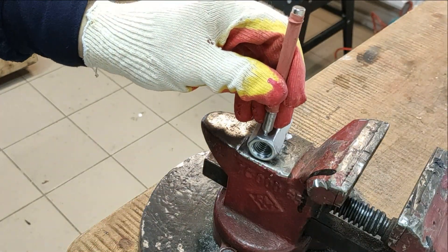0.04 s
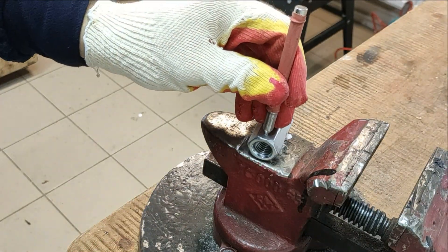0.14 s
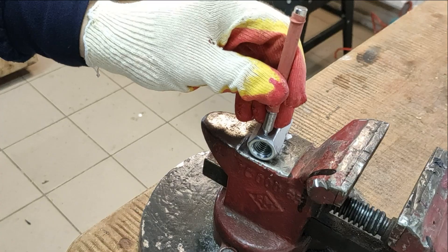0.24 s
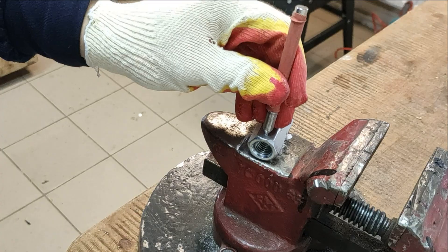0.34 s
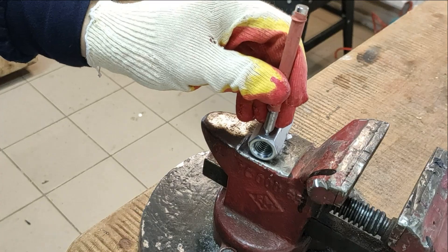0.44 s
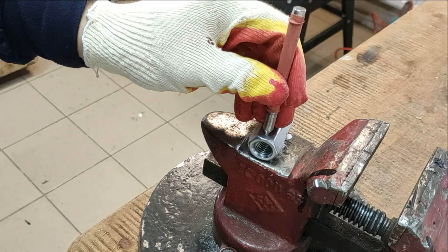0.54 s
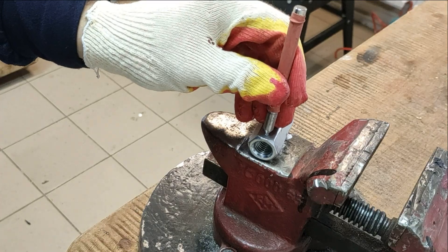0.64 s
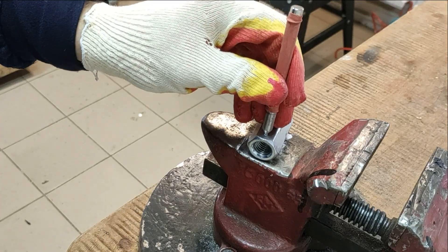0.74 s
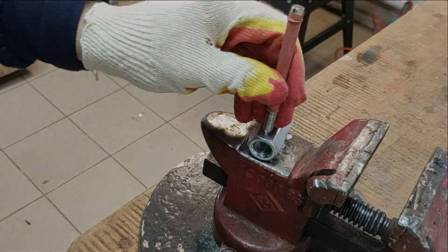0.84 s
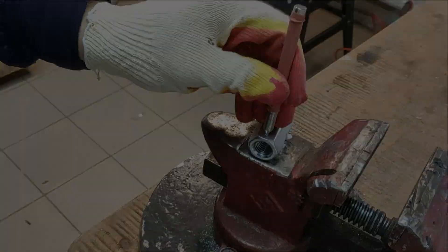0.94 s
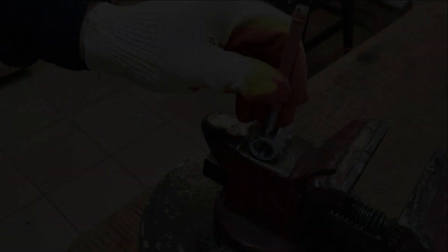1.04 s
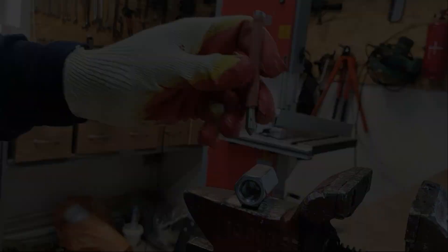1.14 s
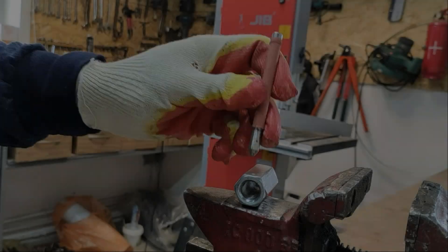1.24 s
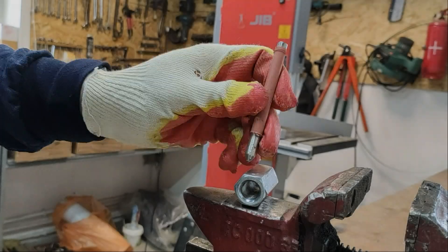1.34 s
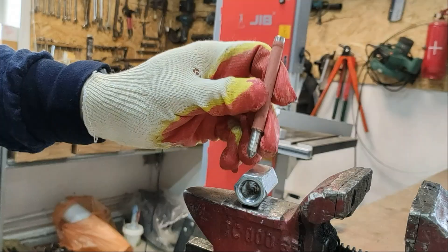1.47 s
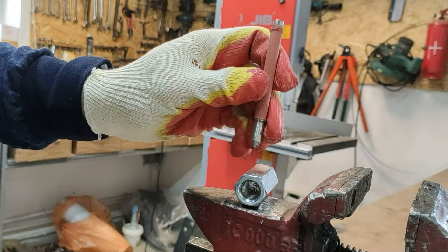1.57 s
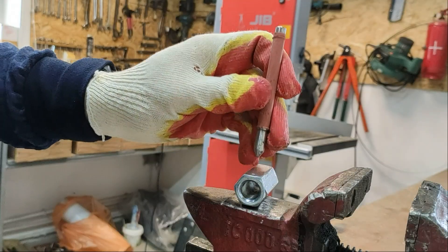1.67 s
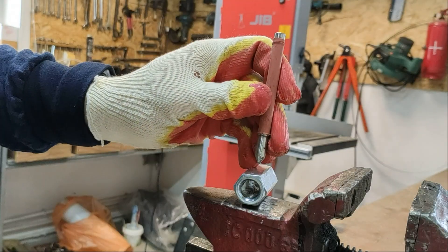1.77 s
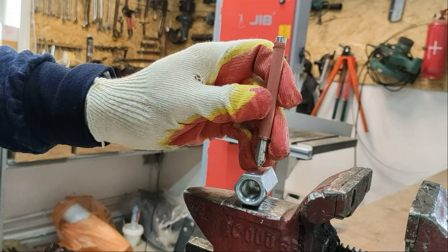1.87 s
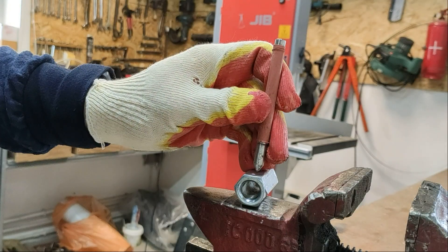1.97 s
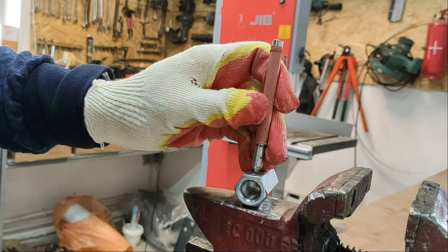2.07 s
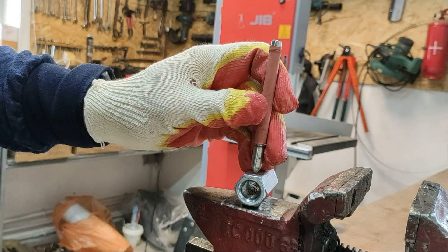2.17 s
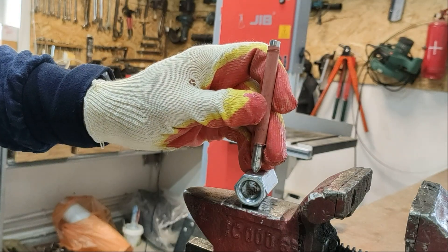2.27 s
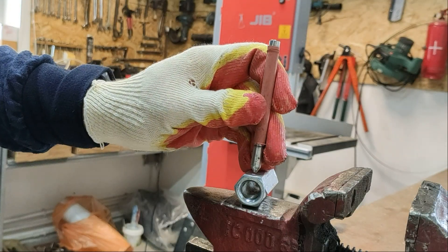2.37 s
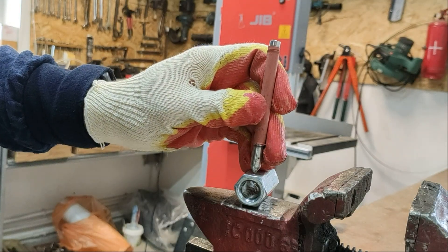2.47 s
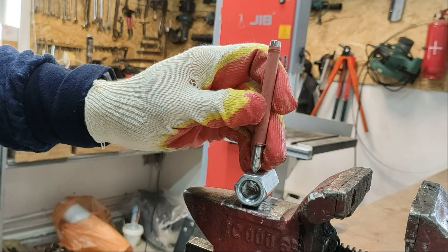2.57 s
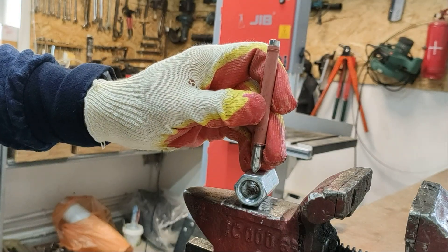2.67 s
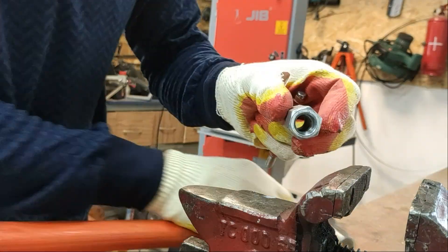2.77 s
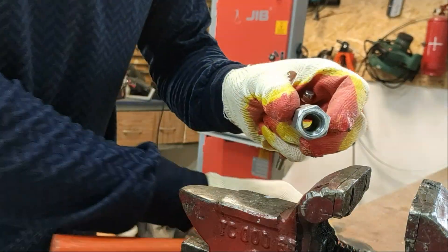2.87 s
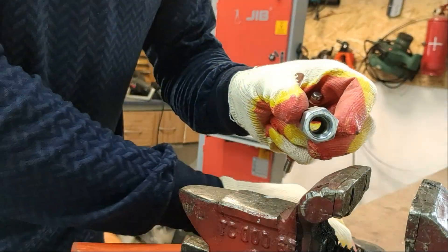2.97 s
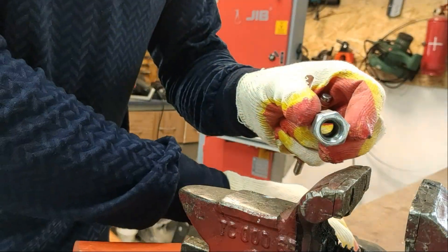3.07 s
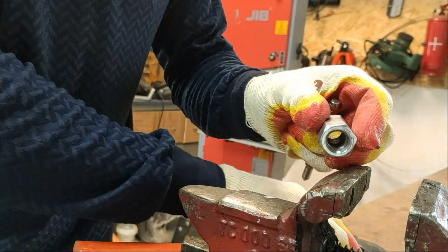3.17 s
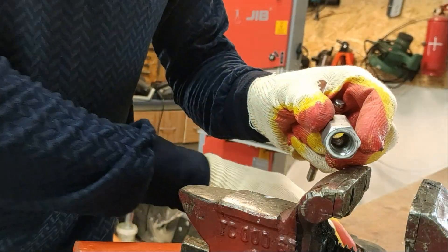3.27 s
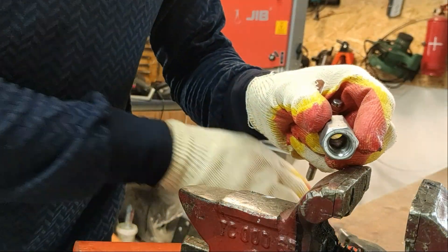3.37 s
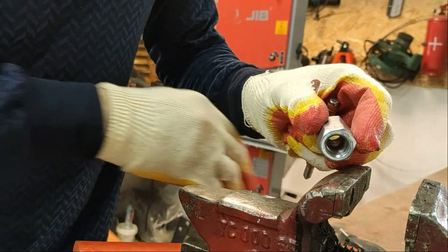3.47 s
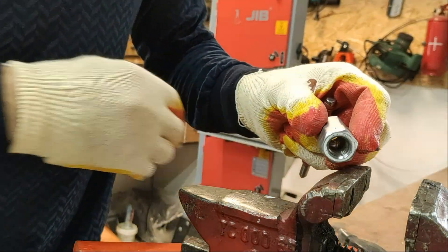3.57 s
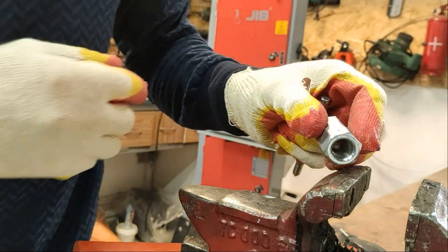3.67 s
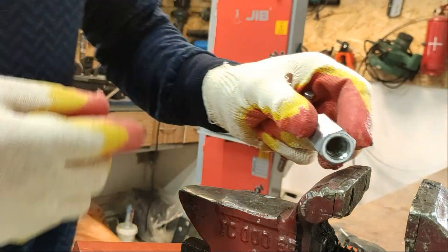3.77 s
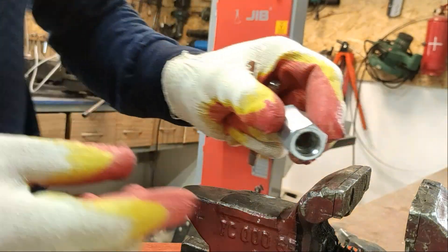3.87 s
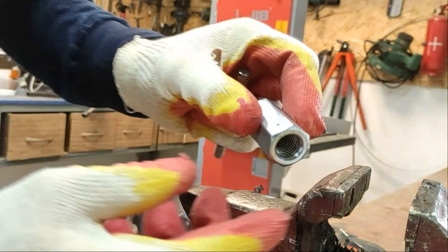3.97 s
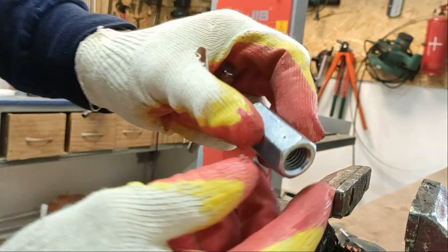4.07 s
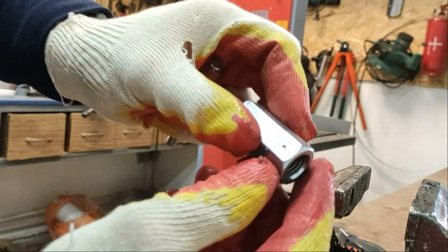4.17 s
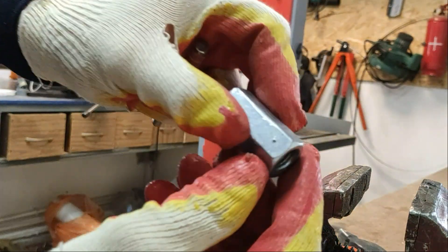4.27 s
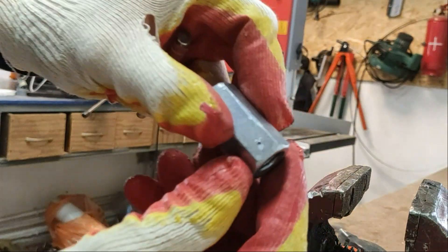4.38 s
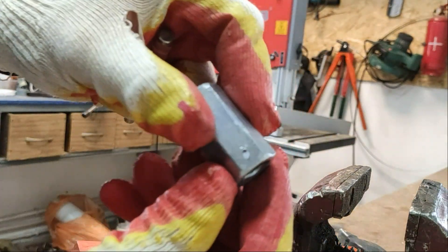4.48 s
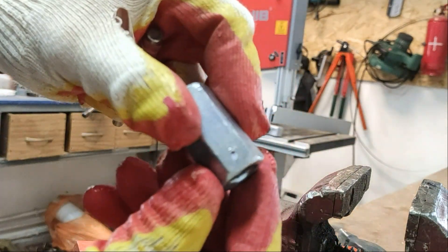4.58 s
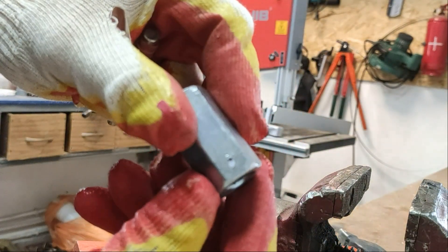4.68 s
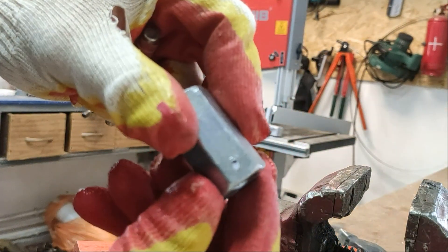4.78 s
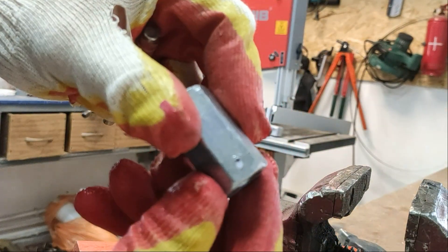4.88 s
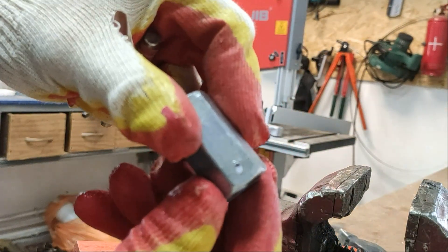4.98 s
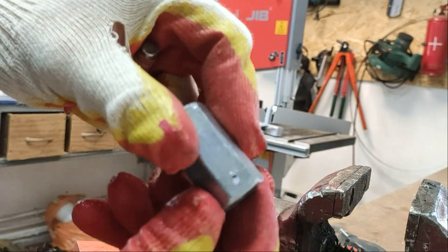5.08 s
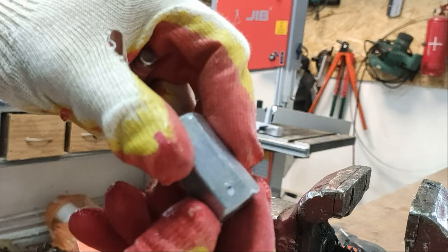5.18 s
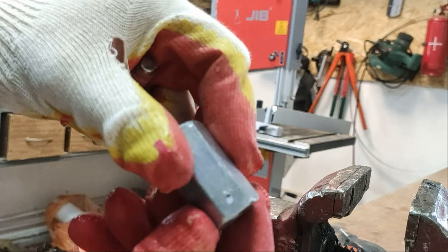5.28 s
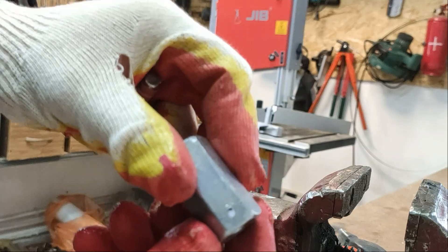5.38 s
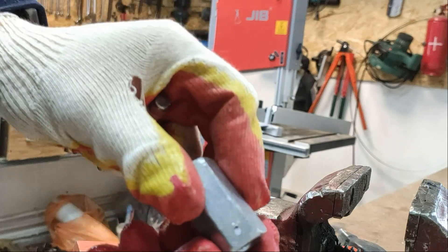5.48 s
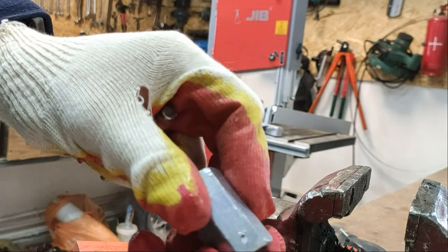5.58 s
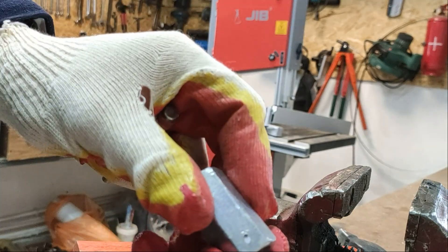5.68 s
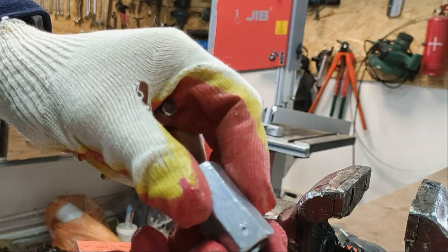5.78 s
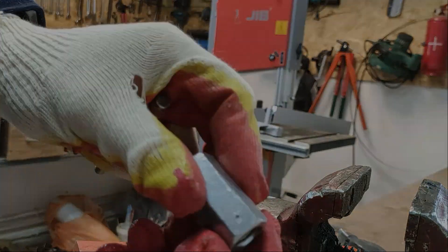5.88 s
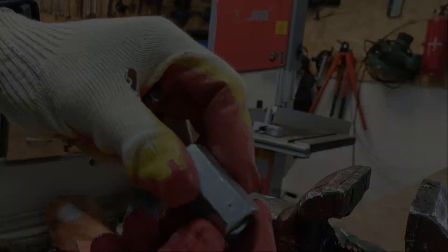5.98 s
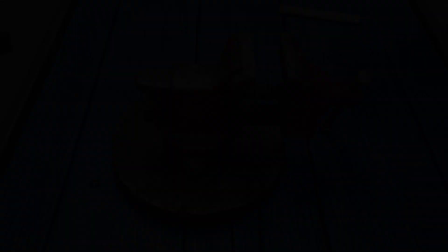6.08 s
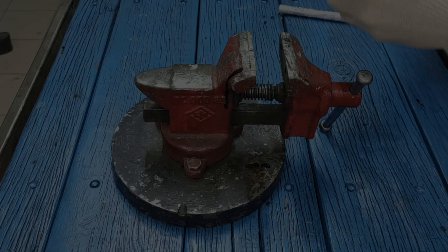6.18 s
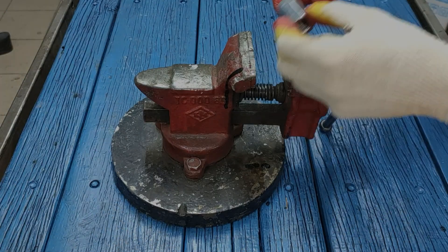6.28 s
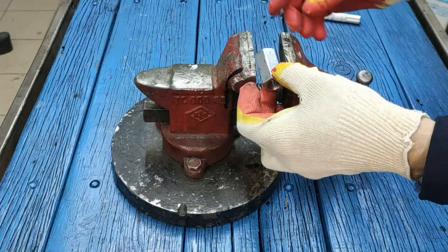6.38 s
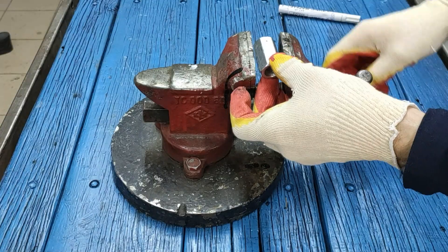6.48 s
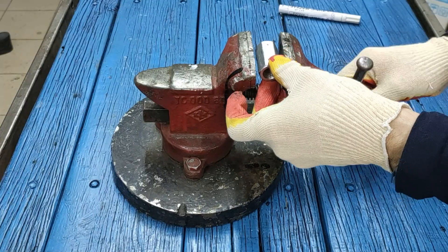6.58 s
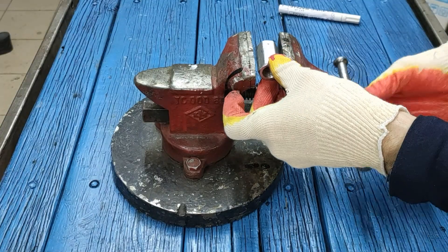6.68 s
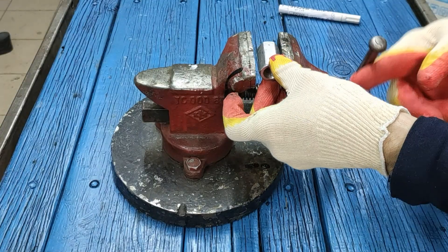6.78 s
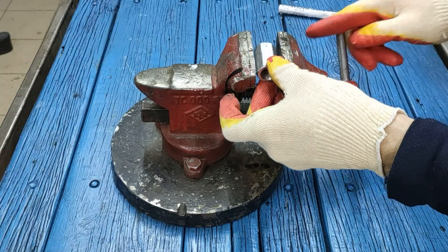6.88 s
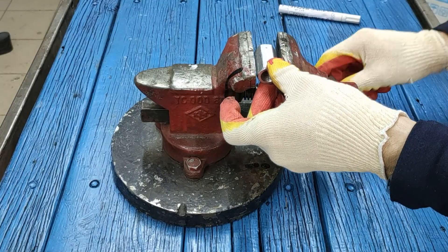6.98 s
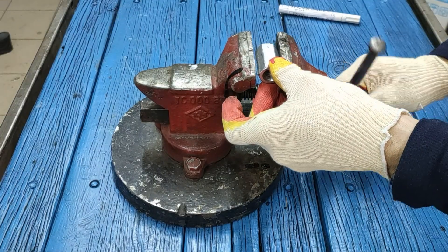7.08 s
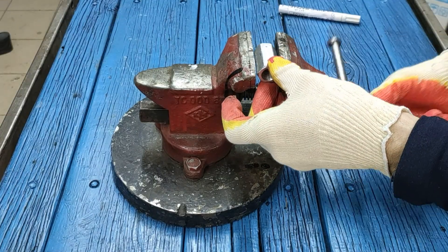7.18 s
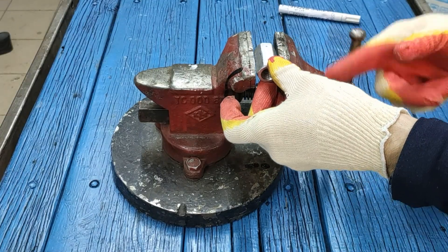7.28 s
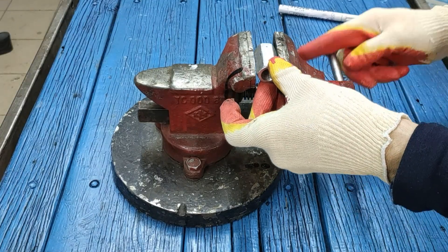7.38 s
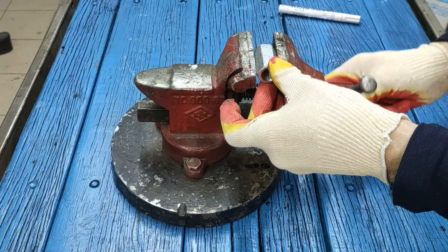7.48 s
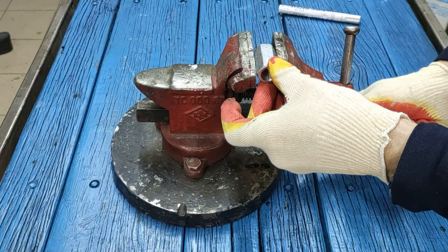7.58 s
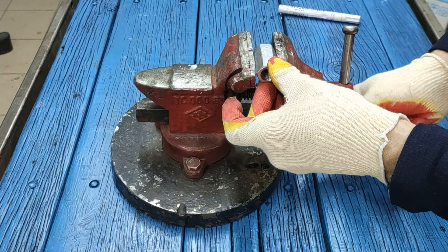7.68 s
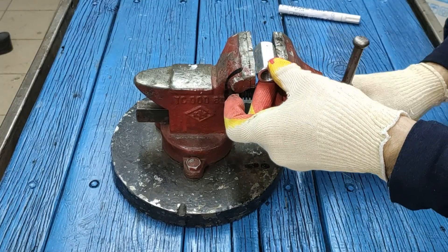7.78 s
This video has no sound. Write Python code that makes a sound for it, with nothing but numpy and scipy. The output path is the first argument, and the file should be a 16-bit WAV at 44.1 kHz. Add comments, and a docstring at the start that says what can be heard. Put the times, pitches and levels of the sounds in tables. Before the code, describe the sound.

Small steel clicks and short creaks, a loud low wooden-metallic slam at three seconds, soft glove rubbing, then a rattling vise handle being wound.

```python
"""Under quiet room air and a low microphone wobble, gloved hands touch steel and cloth (bands of noise).
A rod ticks and creaks on a long nut (clicks alone and in runs), with short scrapes (fluttering noise).
At 3 s a heavy tool bangs onto the bench (filtered clicks, decaying modes, dense ringing); gloves rub.
Then a vise is wound shut: its screw grinds (uneven noise) and knocks the vise body and the bench,
and its loose handle clinks on its stops (noise clicks with ringing modes). Small hard walls answer."""
import sys
import numpy as np
from scipy import signal
from scipy.fft import rfft, irfft, next_fast_len
from scipy.io import wavfile

SR = 44100
rng = np.random.default_rng(int(sys.argv[2]) if len(sys.argv) > 2 else 0)


def dump(signal):
    """Clip the signal to [-1, 1] and save it as 16-bit WAV at the path in sys.argv[1]."""
    limited = np.clip(np.atleast_2d(signal).T, -1, 1)
    pcm = np.round(limited * 32767).astype(np.int16)
    wavfile.write(sys.argv[1], SR, pcm)


N = 345296
T = np.arange(N) / SR  # time of every sample (s)
RING = 65536  # length of a long ringing tail (samples)

# How alike left and right are: pitch_hz, likeness (0 = unrelated, 1 = identical)
LIKENESS = [(120, 0.42), (350, .72), (700, .35), (1300, 0.17), (4000, 0), (15000, 0.26)]
# The heavy blow and its first returns: start_s, level_db, left_minus_right_db, left_lag_ms
BLOW = [(2.9964, 10, -7.5, 0.054), (3.0012, 5.5, -2, 0.069), (3.0022, 5, 3.5, 0.048),
        (3.0143, 8.5, -4, 0.38), (3.045, -2.5, 6, .5), (3.0628, -6, 9, -.3)]
# A glove takes hold: start_s, hiss_level_db, thud_pitch_hz, fall_t60_s
GRABS = [(1.334, -50, 221, 0.68), (2.782, -62, 179.3, 3), (3.886, -59.5, 205, 1.9),
         (4.471, -64.5, 330, 1.05), (6.106, -63, 400, 0.29)]
# The screw takes up its slack and knocks the vise: start_s, vise_body_level_db, bench_level_db
KNOCKS = [(6.631, -15, -50), (6.648, -11, -44), (6.668, -24, -42), (6.686, -24, -23.5), (6.726, -36, -21),
          (6.988, -35.5, -38), (7.0443, -27, -25), (7.136, -29.5, -27), (7.29, -34, -33),
          (7.33, -26, -22.5), (7.395, -27, -31), (7.476, -35.5, -43), (7.638, -36.5, -36.5),
          (7.793, -19, -21)]
# After every knock the thread slips on and the glove slides on the handle, both with this envelope
SLIP_RISE_S, SLIP_FALL_T60_S = 0.022, .45


def amp(db):
    """Decibels to gain."""
    return 10 ** (np.asarray(db) / 20)


def read(points, hz):
    """Read a table of (pitch_hz, value) with straight lines on a log-frequency axis."""
    f, value = np.transpose(points)
    return np.interp(np.log(np.maximum(hz, 1)), np.log(f), value)


def unit(x):
    """Scale to a mean energy of one per channel."""
    return x / np.sqrt(np.mean(np.sum(x ** 2, axis=-1)))


def sides(pan_db):
    """Left and right gains; pan_db is left minus right."""
    return amp(np.array([[pan_db], [-pan_db]]) / 2)


def add(out, s, x):
    """Mix x into out from time s (seconds)."""
    i = int(round(s * SR))
    out[..., i:i + x.shape[-1]] += x[..., :N - i]


def noise(colour, size=N):
    """Stereo noise of a given colour, rms one; left and right share a common part set by LIKENESS."""
    n = next_fast_len(size, True)
    hz = np.fft.rfftfreq(n, 1 / SR)
    alike = np.clip(read(LIKENESS, hz), -.99, .99)
    spectra = rfft(rng.standard_normal((2, n)))
    mid, side = spectra * np.sqrt([1 + alike, 1 - alike]) * amp(read(colour, hz))
    stereo = irfft([mid + side, mid - side], n)[:, :size]
    return unit(stereo) * np.sqrt(size)


def impulse(colour, size=1024):
    """The most compact causal click with a given colour (minimum phase)."""
    log_gain = read(colour, np.fft.rfftfreq(size, 1 / SR)) * np.log(10) / 20
    cepstrum = irfft(log_gain)
    # folding the cepstrum forward packs the energy at the start
    cepstrum[1:size // 2] *= 2
    cepstrum[size // 2 + 1:] = 0
    return unit(irfft(np.exp(rfft(cepstrum))))


def tilted(colour, tilt_db):
    """A colour tilted by some dB per octave."""
    return [(hz, level + tilt_db * np.log2(hz)) for hz, level in colour]


def fade(t60, size):
    """Exponential decay that falls 60 dB in t60 seconds."""
    return np.exp(-np.log(1000) * T[:size] / t60)


def stroke(s, rise, t60):
    """Envelope of a hand movement: a straight rise, then an exponential fall."""
    fall = np.clip((T - s - rise) / t60, 0, 2)
    return np.clip((T - s) / rise, 0, 1) * np.exp(-np.log(1000) * fall)


def swell(x, rise):
    """A push that builds up instead of striking at once."""
    return unit(x * (1 - np.exp(-T[:x.shape[1]] / rise)) ** 2)


def grain(rate_hz, depth_db):
    """Random flutter of a rubbing contact, rms one."""
    knots = np.interp(T * rate_hz, np.arange(N // 10), rng.standard_normal(N // 10))
    gain = amp(depth_db * knots)
    return gain / np.sqrt(np.mean(gain ** 2))


def wash(colour, t60s, count=9):
    """Dense ringing: noise whose octaves die away at their own rates."""
    spectrum = rfft(noise(colour, size=RING))
    octave = np.clip(np.log2(np.fft.rfftfreq(RING, 1 / SR) / 60 + 1e-9), 0, count - 1)
    total = 0
    for k in range(count):
        # neighbouring octave bands overlap as triangles
        band = irfft(spectrum * np.maximum(1 - abs(octave - k), 0))
        total = total + band * fade(read(t60s, 60 * 2. ** k), RING)
    return unit(total)


def ring(modes, size=6000):
    """Decaying modes; the less alike the two sides, the more their phases differ."""
    out = 0
    for hz, db, t60 in modes:
        spread = np.arccos(np.clip(read(LIKENESS, hz), -1, 1)) * rng.choice([-1, 1])
        phase = rng.uniform(0, 2 * np.pi) + np.array([[spread], [-spread]]) / 2
        out = out + amp(db) * fade(t60, size) * np.sin(2 * np.pi * hz * T[:size] + phase)
    return unit(out)


def gripped(modes, spread):
    """Grip and contact point shift the modes a little from blow to blow (spread: share of the pitch)."""
    return [(hz * (1 + spread * rng.standard_normal()), db, t60) for hz, db, t60 in modes]


def in_room(x, wet_db):
    """The sound with the workshop's reverberation, which builds up over a few milliseconds."""
    # Reverberation time: pitch_hz, t60_s
    room_t60 = [(100, 0.63), (500, 0.31), (2000, 0.28), (8000, .36), (15000, 0.1)]
    walls = wash([(100, -1.5), (2000, -2.5), (15000, -2.0)], room_t60)
    walls = walls * (1 - np.exp(-T[:RING] / 0.0049))
    mono = x.mean(0)[None]
    return x + amp(wet_db) * signal.fftconvolve(mono, walls, axes=1)[:, :N]


def background(air_db=-71, rumble_db=-63, rumble_pan_db=-5.5):
    """Still room air and the low wobble of a hand-held microphone, both as coloured noise."""
    # Quiet room air: pitch_hz, relative_level_db (per Hz)
    air_colour = [(53, -37.5), (90, -10.5), (148, -1), (184, -8), (244, -5.5), (393, -11.5), (457, -9),
                  (1090, -16), (1510, -17), (1640, -19), (9310, -19.5), (16000, -19)]
    # Balance of the air: pitch_hz, left_minus_right_db
    air_pan = [(60, -4), (150, -5), (400, -2.5), (2400, -1), (15000, 0)]
    n = next_fast_len(N, True)
    pan = read(air_pan, np.fft.rfftfreq(n, 1 / SR))
    air = irfft(rfft(noise(air_colour), n) * amp(np.array([pan, -pan]) / 2), n)[:, :N]
    rumble = noise([(8, -1), (25, -1), (50, -10.5), (90, -17.0), (200, -34.5), (1000, -80.5)])
    rumble = rumble * grain(rate_hz=5.5, depth_db=2.0)
    return amp(air_db) * air + amp(rumble_db) * rumble * sides(rumble_pan_db)


def gloves(hiss_pan_db=0.14, rustle_pan_db=-1):
    """Knitted, rubber-coated gloves: fibres hiss in fine grains, folds of cloth rustle lower down."""
    # A glove slides over steel or wood: start_s, swell_s, level_db, left_minus_right_db
    swipe_list = [(0.629, 0.018, -65.5, 0), (.918, .08, -58, -0.5), (3.245, 0.019, -57.5, -1),
                  (3.3, 0.024, -65, -2), (3.499, 0.031, -58, -2.5), (3.66, 0.14, -67.5, -2.5),
                  (3.828, 0.017, -61.5, -6), (3.9, 0.063, -58.5, 0.5), (4.13, 0.062, -61, 0),
                  (4.89, .02, -68.5, 0), (5.62, 0.021, -69, -3), (6.78, 0.074, -68.5, 0)]
    # A sleeve shifts as the hands move: start_s, swell_s, fall_t60_s, level_db
    sleeve_list = [(3.97, 0.065, .5, -64), (4.73, 0.18, 2.6, -66.5)]
    # Hiss of the fibres: pitch_hz, relative_level_db (per Hz)
    hiss_colour = [(300, -21.5), (900, -5), (1850, -3.5), (3000, -3.5), (5600, -2), (9300, -0.5),
                   (15500, -8.5)]
    # Folding cloth: pitch_hz, relative_level_db (per Hz)
    rustle_colour = [(80, -2.5), (180, -4), (400, 0.5), (700, -8.5), (1200, -17), (3000, -25.5)]
    grab_rise_s, handle_hiss_db = 0.0056, -46  # handle hiss is relative to each knock
    swipe_fall = 14  # t60 as a multiple of the swell
    grab_rustle_db, swipe_rustle_db = -2.5, -10  # relative to the hiss

    # movements overlap, so their powers are added
    grabs = sum((amp(db) * stroke(s, grab_rise_s, t60)) ** 2 for s, db, _, t60 in GRABS)
    swipes = sum((amp(db) * sides(pan) * stroke(s, rise, swipe_fall * rise)) ** 2
                 for s, rise, db, pan in swipe_list)
    winding = sum((amp(db + handle_hiss_db) * stroke(s, SLIP_RISE_S, SLIP_FALL_T60_S)) ** 2
                  for s, db, _ in KNOCKS)
    sleeves = sum((amp(db) * stroke(s, rise, t60)) ** 2 for s, rise, t60, db in sleeve_list)
    hiss = np.sqrt(grabs + swipes + winding)
    rustle = np.sqrt(grabs * amp(grab_rustle_db) ** 2 + swipes * amp(swipe_rustle_db) ** 2 + sleeves)

    fibres = hiss * noise(hiss_colour)
    fibres = fibres * grain(rate_hz=690, depth_db=1.5) * grain(rate_hz=29, depth_db=1.14)
    folds = rustle * noise(rustle_colour) * grain(rate_hz=40, depth_db=2.5)
    return fibres * sides(hiss_pan_db) + folds * sides(rustle_pan_db)


def touches(bump_t60=.16, grab_thud_db=3, pan_db=-4.0):
    """Padded contacts: a push so soft that only one damped band answers."""
    # Padded bumps: start_s, level_db, pitch_hz
    bump_list = [(.255, -62.5, 590), (.257, -46, 62), (.395, -64.5, 533), (.882, -46.5, 76),
                 (.884, -65, 630), (1.336, -50.5, 653), (1.351, -43, 208), (1.812, -67.5, 690),
                 (1.927, -67, 556), (2.23, -69.5, 696), (5.878, -60.5, 840), (5.882, -66, 1880),
                 (6.108, -55, 404), (6.109, -64, 1250), (6.526, -56, 1130), (6.78, -61, 1800)]
    grab_thuds = [(s, hiss_db + grab_thud_db, hz) for s, hiss_db, hz, _ in GRABS]
    out, size = np.zeros((2, N)), 12000
    for s, db, hz in bump_list + grab_thuds:
        colour = [(hz / 4, -26), (hz * 0.97, -10), (hz, 0), (hz * 1.35, -12), (hz * 4, -34), (hz * 30, -70)]
        # a lower thud starts more slowly
        onset = 1 - np.exp(-T[:size] * hz * 2)
        add(out, s, amp(db) * noise(colour, size=size) * fade(bump_t60, size) * onset)
    return in_room(out * sides(pan_db), wet_db=-6.5)


def ticks(chatter_t60=0.01, chatter=1.0):
    """Small parts meet: a hard contact with a few milliseconds of chatter."""
    # Light dry ticks: start_s, level_db, left_minus_right_db, tilt_db (per octave)
    tick_list = [(0.2746, -40.5, 3, -4.5), (1.1616, -33, -5, 6), (1.4245, -15, -9.5, 0),
                 (2.0978, -34.5, -3, -4), (2.1654, -37, -2, -3.5)]
    # Colour of a tick before the tilt: pitch_hz, relative_level_db (per Hz)
    tick_colour = [(300, -1), (1100, -13), (1700, 3), (2800, 0.5), (5000, -3), (9000, 1.5), (13000, 9),
                   (15500, 2.5)]
    out = np.zeros((2, N))
    for s, db, pan, tilt_db in tick_list:
        colour = tilted(tick_colour, tilt_db)
        tick = impulse(colour) + chatter * unit(noise(colour, size=1024) * fade(chatter_t60, 1024))
        add(out, s, amp(db) * sides(pan) * tick)
    return in_room(out, wet_db=-4.5)


def creaks(chatter=1.0, chatter_t60=0.0056):
    """The rod sticks and slips on the nut: a run of tiny clicks that grow as the pressure builds."""
    # Creaks: start_s, length_s, last_slip_level_db, slips_per_s, tilt_db (per octave), left_minus_right_db
    creak_list = [(0.371, .035, -31, 700, 3.5, 12), (1.945, .068, -28.5, 220, -1.5, -3)]
    # Colour of one slip before the tilt: pitch_hz, relative_level_db (per Hz)
    creak_colour = [(400, -8.5), (1100, -12.5), (1800, 4), (2600, -1), (3300, -6), (5500, -1.5),
                    (7500, -9.5), (15000, -5)]
    growth_db, scatter_db = 14, 1.5
    jitter = .3  # scatter of the timing, as a share of the spacing
    out = np.zeros((2, N))
    for s, length, last_db, rate, tilt_db, pan in creak_list:
        colour = tilted(creak_colour, tilt_db)
        click = impulse(colour)
        for done in np.linspace(0, 1, int(length * rate)):
            rattle = unit(noise(colour, size=1024) * fade(chatter_t60, len(click)))
            slip = unit(click + chatter * rattle)
            at = s + done * length + jitter * rng.standard_normal() / rate
            db = last_db - growth_db * (1 - done) + scatter_db * rng.standard_normal()
            add(out, at, amp(db) * sides(pan) * slip)
    return in_room(out, wet_db=-6.5)


def scrapes(treble_db=-15, pan_db=-2.0):
    """Metal drags on metal in tiny slips that ring the contact: short fluttering bands of noise."""
    # Scrapes of steel on steel: start_s, length_s, level_db, contact_pitch_hz
    scrape_list = [(0.27, 0.012, -58, 3770), (1.804, 0.0085, -64, 1470), (1.906, .007, -65, 2020),
                   (2.219, 0.0087, -57.5, 1740), (4.383, .03, -71, 1900), (6.624, 0.062, -45.5, 1580),
                   (6.623, 0.068, -45, 770), (7.116, .022, -55.5, 1950), (7.129, .03, -53, 1510),
                   (7.269, .045, -60, 783)]
    out, slips = np.zeros((2, N)), grain(rate_hz=900, depth_db=5.5)
    for s, length, db, hz in scrape_list:
        below = [(hz / 4, -24), (hz * .7, -10), (hz, 0)]
        above = [(hz * 1.46, treble_db - 5), (hz * 4, treble_db - 11), (hz * 12, treble_db - 21)]
        size = int(length * SR)
        add(out, s, amp(db) * noise(below + above, size=size) * signal.windows.tukey(size, .5))
    return in_room(out * slips * sides(pan_db), wet_db=-4.5)


def screw(start_s=6.35, length_s=1.38, ease_s=0.29, winding_db=-64.5, slip_db=-68.5):
    """The thread grinds in uneven slips while it turns, and slips on after each knock."""
    # The grinding screw: pitch_hz, relative_level_db (per Hz)
    grind_colour = [(90, -4.5), (235, -1.5), (340, -6.5), (460, -5), (780, -4), (930, -9), (1500, -9.5),
                    (2200, -17.5), (6000, -27.5), (15000, -18)]
    t = np.clip(T - start_s, 0, length_s)
    # the turning eases in and out
    turning = amp(winding_db) * np.minimum(np.minimum(t, length_s - t) / ease_s, 1)
    slipping = sum((amp(slip_db) * stroke(s, SLIP_RISE_S, SLIP_FALL_T60_S)) ** 2 for s, *_ in KNOCKS)
    grind = noise(grind_colour) * grain(rate_hz=45, depth_db=4.5)
    return in_room(grind * np.sqrt(turning ** 2 + slipping), wet_db=-2.0)


def handle(click_t60=0.019, body_rise=0.0011, bar_rise=0.00079, mount_rise=0.0092, body_low_hz=330):
    """The sliding handle clinks on its stops; the screw knocks the vise body, which thumps the bench."""
    # The handle hits its stops: start_s, click_level_db, bar_ring_db, knob_ring_db (rings above the click)
    clink_list = [(6.419, -16.5, -10, -21), (6.5071, -26.5, -18, -17), (6.527, -34, -20, 1.5),
                  (6.638, -25.5, -13, 12), (6.683, -21, -3.5, -12), (7.1276, -23.5, 5.5, -4.5),
                  (7.7875, -21, -6, 13.5), (7.7929, -15.5, -8, 8)]
    # Modes of the vise body: pitch_hz, relative_level_db, t60_s
    vise_modes = [(468, -0.5, 0.075), (599, -4.5, 0.097), (742, -0.5, 0.057), (802, 3.5, 0.042),
                  (1080, -3, 0.056), (1213, -6, .04), (1422, -6, 0.048), (1726, -8.5, 0.038),
                  (1880, -9, 0.027)]
    # Modes of the handle bar: pitch_hz, relative_level_db, t60_s
    bar_modes = [(1470, 0.5, 0.065), (1593, 0, 0.032), (1846, -5.5, 0.052), (3065, 5, 0.016),
                 (3170, 6, 0.022), (4500, -3.5, 0.045), (4825, -2.5, 0.028), (5940, -3, 0.037),
                 (6650, -4.5, 0.033), (12300, -13, .025)]
    # Modes of the bar's end knob: pitch_hz, relative_level_db, t60_s
    knob_modes = [(9000, -0.5, 0.012), (9140, -0.5, .06), (9560, 1.5, 0.036), (10350, -0.5, 0.021),
                  (11600, -1.5, 0.017), (13300, 0, .02), (14450, -4, 0.031), (15550, -6, .035)]
    # The bench under the vise, answering late and low: pitch_hz, relative_level_db, t60_s
    mount_modes = [(125, -5, 0.1), (160, -8, 0.068), (210, -3.5, 0.09), (237.7, 3.5, 0.11),
                   (324, -4, 0.082)]
    # Steel meeting steel: pitch_hz, relative_level_db (per Hz)
    click_colour = [(300, -11), (1000, -8.5), (3200, 0), (4200, -4.5), (5000, -3.5), (6800, -10),
                    (8600, -1.5), (11000, -6.5), (15500, -6)]
    clink_body_db = -19  # the vise body under each click
    rebound_s, rebound_db = .009, -6
    jolt_bar_db, jolt_click_db = -13.5, -13  # the handle, relative to each knock

    def vise():
        return swell(ring(gripped(vise_modes, spread=0.011)), body_rise)

    def bar():
        # the bar bends in two planes, so its modes come in close pairs
        pairs = gripped(bar_modes, spread=0.0307) + gripped(bar_modes, spread=.012)
        return swell(ring(pairs), bar_rise)

    def knob():
        return ring(gripped(knob_modes, spread=0.008) + gripped(knob_modes, spread=0.0144))

    def click():
        return unit(noise(click_colour, size=6000) * fade(click_t60, size=6000))

    body, bright, bench = np.zeros((3, 2, N))
    for s, db, bar_db, knob_db in clink_list:
        clink = click() + amp(bar_db) * bar() + amp(knob_db) * knob()
        add(bright, s, amp(db) * clink)
        add(body, s, amp(db + clink_body_db) * vise())
    for s, db, bench_db in KNOCKS:
        # each knock rebounds once, and both jolt the handle
        for at, gain in (s, amp(db)), (s + rebound_s, amp(db + rebound_db)):
            add(body, at, gain * vise())
            add(bright, at, gain * (amp(jolt_bar_db) * bar() + amp(jolt_click_db) * click()))
        add(bench, s, amp(bench_db) * swell(ring(mount_modes), mount_rise))
    # the vise is too small to radiate bass
    body = signal.sosfilt(signal.butter(4, body_low_hz, "high", fs=SR, output="sos"), body)
    return in_room(body + bench, wet_db=-3.5) + in_room(bright, wet_db=-1.5)


def crack(db=-11, t60=.016, pan_db=-3):
    """The tool's first hard contact: a burst of noise over within milliseconds."""
    colour = [(1000, -8), (3300, 2.5), (4200, -8.5), (5600, 0), (8000, -7), (11000, -12), (15000, -24)]
    burst = noise(colour, size=1024)
    out = np.zeros((2, N))
    add(out, BLOW[0][0], amp(db) * sides(pan_db) * unit(burst * fade(t60, burst.shape[1])))
    return out


def bang(boom_db=15.5, modes_db=15, pan_db=-1.3, sway_hz=44.5, sway_db=-40, sway_t60=2.2,
         echo_hz=2200, tool_db=-5):
    """A heavy tool lands and rebounds; the bench top rings, its frame sways, and the room carries it on."""
    # The blow: pitch_hz, relative_level_db (per Hz)
    blow_colour = [(60, -31), (250, -8), (480, 5.5), (680, 4.5), (1000, -11.5), (1500, -11), (2400, -25),
                   (3400, -18.5), (4100, -41.5), (5600, -30), (8000, -41.5), (15000, -58)]
    # Dense ringing after the blow: pitch_hz, relative_level_db (per Hz)
    boom_colour = [(30, -38), (75, -16), (105, -21.5), (135, -11), (178, -20), (240, -9), (375, -7),
                   (560, 0.5), (760, -5), (1000, -8), (1420, -18), (1900, -16.5), (3400, -31),
                   (4100, -37.5), (5700, -36.5), (11000, -44.5), (15000, -52)]
    # Decay of bench and room together: pitch_hz, t60_s
    boom_t60 = [(60, 0.74), (140, 0.77), (350, 0.57), (700, .48), (1500, .45), (3000, 0.46), (6000, 0.42),
                (14000, .5)]
    # Bench modes: pitch_hz, relative_level_db, t60_s
    bench_modes = [(82, -25, 0.6), (139.7, -15, 0.66), (204.4, -15, .45), (231, -11.5, 0.49),
                   (254.6, -13, 0.41), (309.7, -5.5, 0.51), (338.5, -9, 0.67), (403, -5, 0.46),
                   (443, -8, 0.29), (501, -4, 0.4), (507.5, -1, 0.29), (569, -2.5, .41), (671, -1, 0.5),
                   (798, -6, 0.22), (894, -12, 0.24), (970, -11.5, 0.61), (1028, -10, 0.22),
                   (1140, -12.5, 0.34), (1253, -15, .35), (1341, -14, .25), (1600, -15.5, 0.41)]
    # Modes of the heavy steel tool, damped by the hand: pitch_hz, relative_level_db, t60_s
    tool_modes = [(2360, 0, .08), (3000, -4, .06), (3404, 0.5, .09), (3622, -3.5, .05), (5280, -6.5, .04),
                  (5620, -8, 0.037), (6180, -9, 0.039), (7520, -13.5, 0.028)]

    out, knock = np.zeros((2, N)), impulse(blow_colour)
    for s, db, pan, lag_ms in BLOW:
        left, right = -amp(db) * sides(pan) * knock
        add(out[0], s + lag_ms / 1000, left)
        add(out[1], s, right)
        # every return is duller than the one before
        knock = unit(signal.lfilter(*signal.butter(1, echo_hz, fs=SR), knock))

    start_s, t = BLOW[0][0], T[:RING]
    body = amp(boom_db) * wash(boom_colour, boom_t60) + amp(modes_db) * ring(bench_modes, size=RING)
    sway = amp(sway_db) * np.sin(2 * np.pi * sway_hz * t) * fade(sway_t60, RING)
    sway = sway * (1 - np.exp(-t / 0.033))
    add(out, start_s, (body + sway) * sides(pan_db) * (1 - np.exp(-t / .004)))
    add(out, start_s, amp(tool_db) * ring(tool_modes))
    return out


def scene():
    """Everything at the bench, from the still air to the heavy bang."""
    quiet = background() + gloves() + touches()
    rod = ticks() + creaks() + scrapes()
    return quiet + rod + screw() + handle() + crack() + bang()


def record(dry, top_hz=15900):
    """The recorder cuts the top with a steep low-pass filter."""
    return signal.sosfilt(signal.ellip(10, .2, 70, top_hz, fs=SR, output="sos"), dry)


dry = scene()
out = record(dry)
dump(out)
```